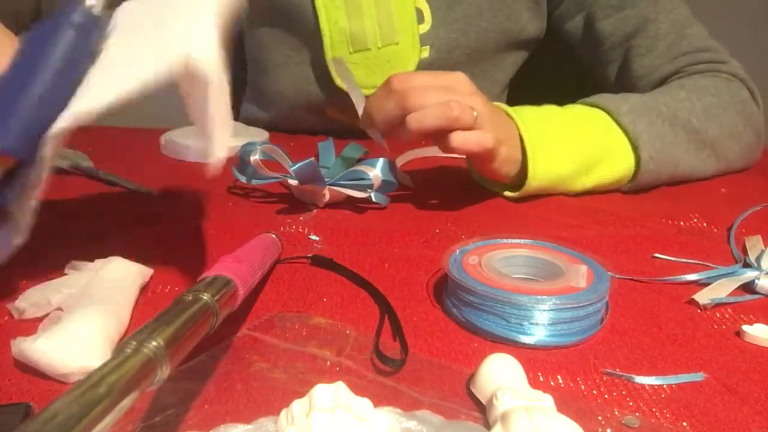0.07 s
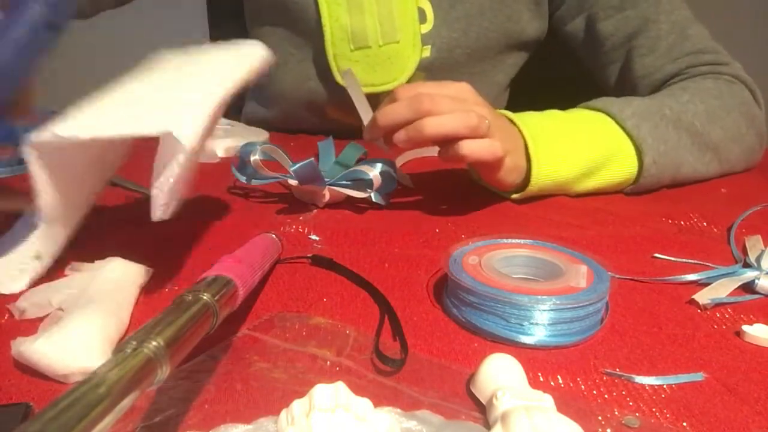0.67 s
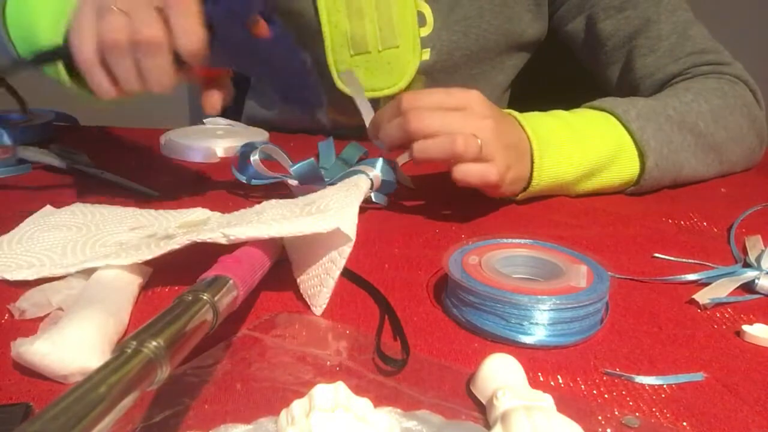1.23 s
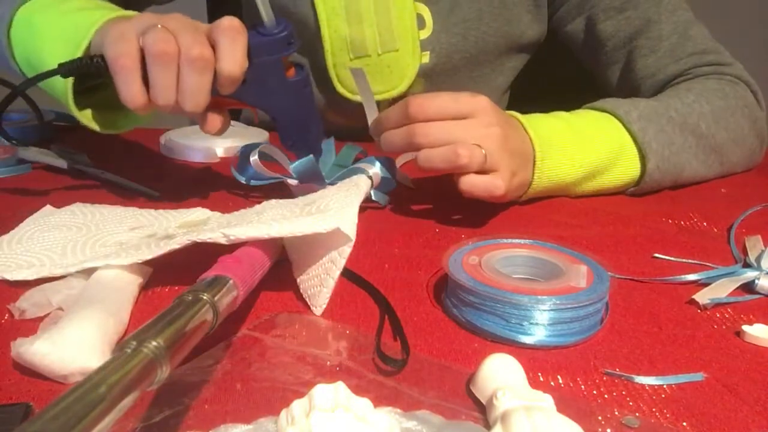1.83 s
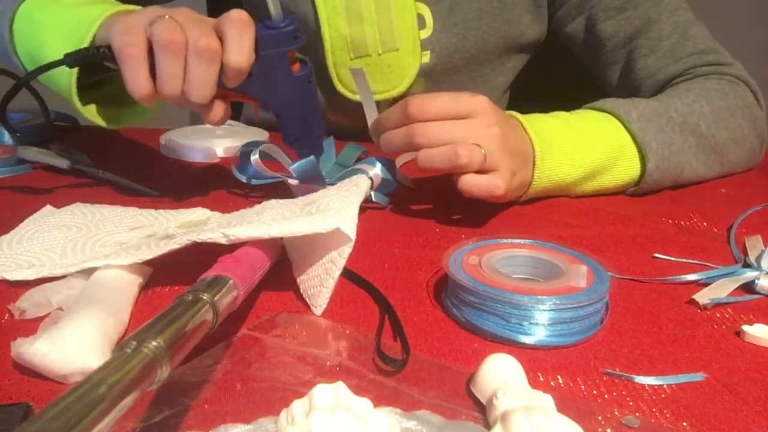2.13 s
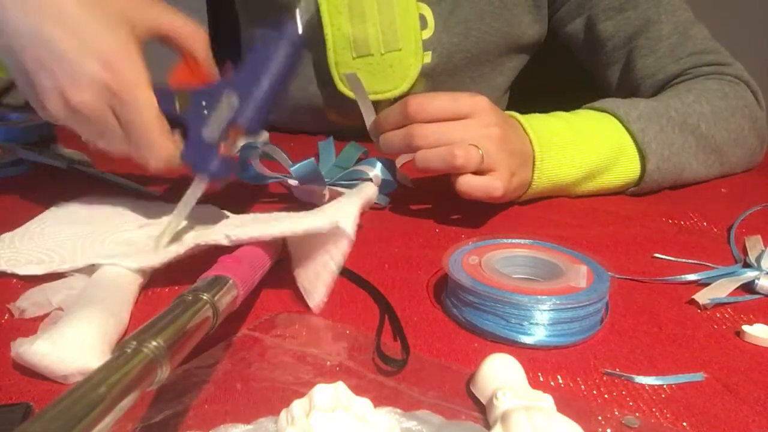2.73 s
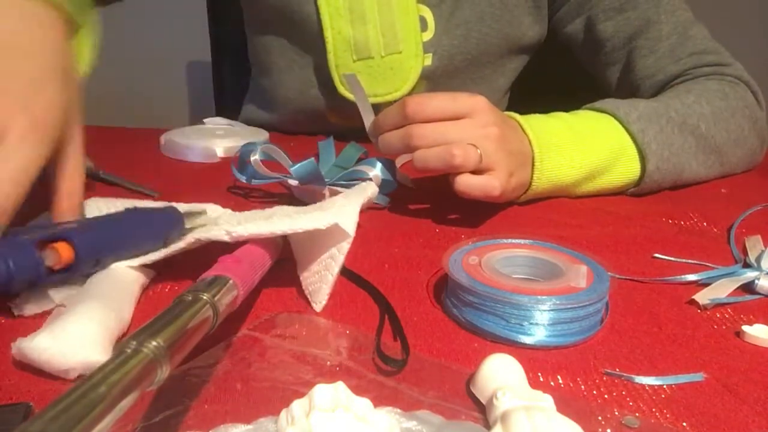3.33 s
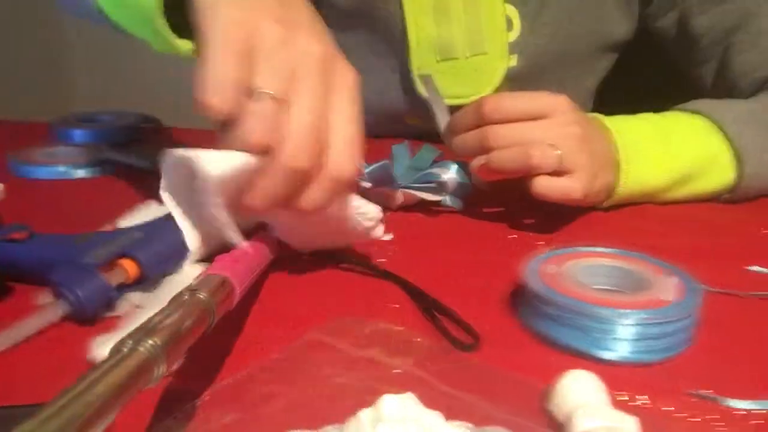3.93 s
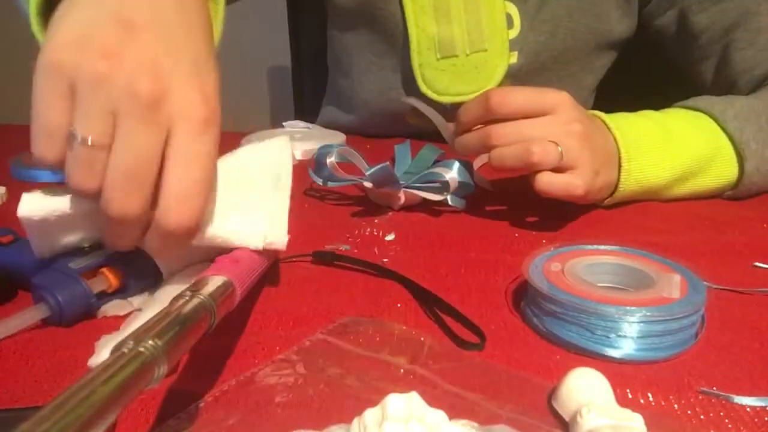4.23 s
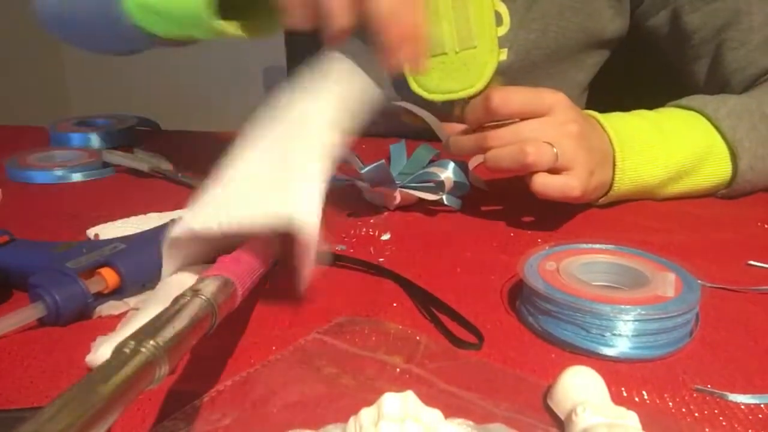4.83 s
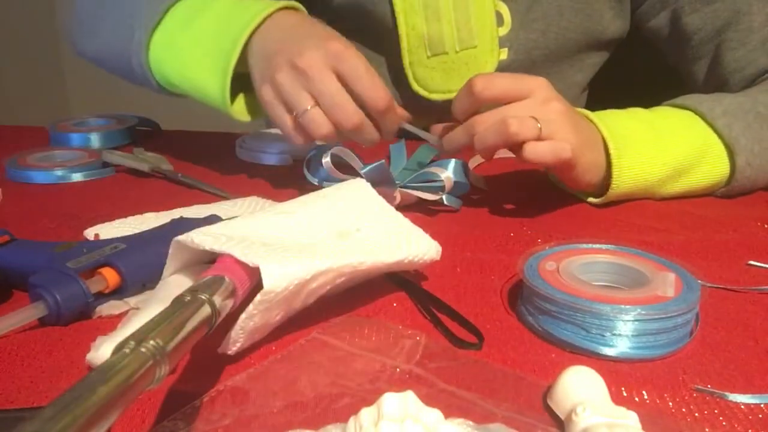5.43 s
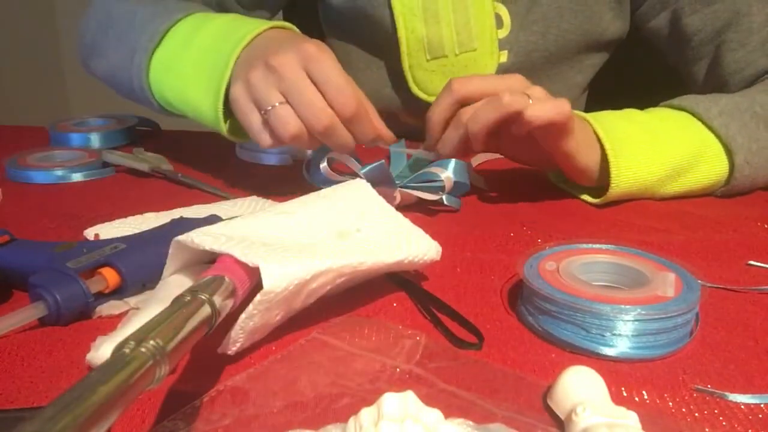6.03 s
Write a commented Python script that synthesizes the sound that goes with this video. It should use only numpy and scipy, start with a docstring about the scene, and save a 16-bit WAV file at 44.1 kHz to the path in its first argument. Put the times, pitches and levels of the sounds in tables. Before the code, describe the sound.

In a small, quiet room, a microphone on the table picks up soft room noise, a faint appliance hum and a thin whine. During the first second a paper towel drags and rustles softly while a plastic glue gun gives light, hollow ticks, with a sharper click at about 1 second. Until 3 seconds there are only sparse small taps, faint ribbon rubs and a brief brush of paper. At about 3.3 seconds the gun thumps onto the cloth-covered table, clatters and topples with one loud knock at 3.4 seconds, the loudest moment. Another plastic tap follows near 3.9 seconds. From about 3.7 to 5 seconds the paper towel is dragged in several stronger, swelling strokes, its folds crinkling and snapping. A faint ribbon rub comes at about 5.3 seconds, then only room noise remains until 6 seconds.

```python
"""A plastic glue gun is handled and laid down on a cloth-covered table in a small, quiet room.
Its hollow shell rings in short ticks; it thumps, clatters and topples over with one loud knock
that shakes the tabletop. A paper towel is dragged and draped over the tools: its fibres catch and
slip in swelling strokes, and its folds snap. Ribbon rustles under the fingers.
Behind it all are soft room noise, the hum of a far appliance and a thin whine."""
import sys
import numpy as np
from scipy import signal
from scipy.fft import rfft, irfft
from scipy.io import wavfile
from scipy.ndimage import uniform_filter1d

SR = 44100
rng = np.random.default_rng(int(sys.argv[2]) if len(sys.argv) > 2 else 0)


def store_wav(level_fs):
    """Save 16-bit WAV to argv[1]."""
    pcm = np.round(np.clip(np.atleast_2d(level_fs), -1, 1) * 32767)
    wavfile.write(sys.argv[1], SR, pcm.T.astype(np.int16))


N = 268569
TIME, BINS = np.arange(N) / SR, np.fft.rfftfreq(N, 1 / SR)

# The tone colour of each noise. Each row: frequency in Hz, relative level in dB.
AIR_COLOUR = [(10, -22.5), (25, -12.5), (52, 3.5), (95, -9), (170, -7.5), (400, -13.5), (1000, -15),
              (2000, -21), (4000, -27), (6500, -31), (8500, -31), (15500, -39.5)]  # the still room
SCRAPE_COLOUR = [(300, -11.5), (650, -2), (1000, 1), (1500, 4.5), (2200, -0.5), (3400, -13.5),
                 (6000, -27.5)]  # the towel's mid-pitched scrape
HISS_COLOUR = [(1400, -42), (2500, 1.5), (3300, 2.5), (4500, 0.5), (6100, 0.5), (8000, -6), (11000, -9),
               (15500, -23.5)]  # its high hiss
FLAP_COLOUR = [(30, -4), (80, -2.5), (160, -0.5), (300, 0), (550, -8.5), (900, -13.5), (2000, -48)]  # its low flapping
FOLD_COLOUR = [(300, -15), (1300, -1), (2600, 1), (5500, -7.5), (9000, -13.5), (15000, -24)]  # its snapping folds
RIBBON_COLOUR = [(1200, -23), (2700, 1), (3500, 0.5), (5000, 3.5), (6700, 0.5), (9000, -8), (15000, -27)]  # rubbed ribbon
ECHO_COLOUR = [(60, -6), (200, 4), (600, -1), (1300, 1), (3500, -0.5), (7000, -5), (15000, 0)]  # the room's echo
# How long the echo lasts. Each row: frequency in Hz, fade time in seconds.
# A fade time, or t60, is how long a sound takes to drop by 60 dB.
ECHO_FADE = [(100, .5), (300, 0.49), (800, 0.3759), (2000, 0.4849), (5000, 0.44), (14000, 0.51)]
# Strokes of the towel. Each row: fastest moment in seconds, level in dB, rise and fall in seconds,
# extra level for the hiss and for the flap in dB.
TOWEL_STROKES = [(.01, -63, 0.028, .035, -5.5, -11), (.1, -71, .04, 0.036, -1.5, -2),
                 (.168, -66.5, 0.034, 0.014, -5, -4), (.258, -69.5, 0.039, 0.038, 5, -0.5),
                 (.38, -70.5, 0.075, 0.036, 5, 2.5), (.51, -76.5, 0.035, .03, -3, 7),
                 (.65, -67.5, 0.096, 0.033, -7.5, -6), (.75, -72, 0.023, 0.028, -1, 2),
                 (.925, -69.5, 0.048, .035, 1.5, 6), (1.17, -77.5, 0.11, 0.15, -3, 5.5),
                 (2.74, -66.5, .02, .04, 3, -8), (3.06, -75.5, .015, .04, -4, -3),
                 (3.183, -65.5, 0.011, 0.013, -15, 1.5), (3.245, -66, 0.012, 0.055, -7, 4),
                 (3.746, -68.5, 0.0059, 0.067, 1.5, -5), (3.9, -64, 0.015, 0.015, -1.5, 12.5),
                 (3.973, -54.5, 0.023, 0.029, -1, 5.5), (4.10, -50.5, 0.032, 0.058, -4, -9.5),
                 (4.376, -56.5, 0.07, 0.025, -5.5, -8.5), (4.465, -57, 0.044, 0.041, -1.5, -2),
                 (4.614, -51.5, .04, 0.036, -1, -11), (4.765, -58, 0.054, 0.034, -3.5, -6),
                 (4.882, -69, 0.0091, 0.011, 2, -1), (5.012, -68, 0.044, 0.023, -3, 0)]
# Taps: plastic parts of the gun, and one tick of the ribbon at 1.26 s. Each row: start in seconds, ring level
# in dB, ring pitch in Hz, # snap level in dB, snap brightness in Hz, relative echo level in dB.
TAPS = [(0.1514, -44, 1090, -59, 2500, 2), (0.3032, -41.5, 1060, -61, 3000, -0.5),
        (.3492, -42.5, 1390, -69, 3000, -8), (0.467, -41, 940, -42.5, 2200, -4),
        (.7075, -54, 3320, -49.5, 6900, -12), (0.9971, -50, 2950, -34, 5270, -20),
        (0.9992, -37.5, 5070, -38, 4350, -1.5), (1.01, -54, 6000, -41, 5000, -6),
        (1.2588, -50, 3500, -56.5, 6500, 2), (1.6, -54.5, 735, -63.5, 5040, -16),
        (2.3525, -45.5, 2450, -55, 2980, -9), (2.6848, -53.5, 1000, -59.5, 2800, -5),
        (3.1641, -44, 1130, -44.5, 4700, -0.5), (3.2266, -36, 880, -48, 2100, -1.5),
        (3.278, -37, 455, -56, 12000, 5.5), (3.304, -33.5, 950, -35, 2600, -3.5),
        (3.361, -30.5, 1030, -26, 5300, -6), (3.3812, -30, 725, -40.5, 3500, 6),
        (3.4015, -28, 2050, -36, 10500, -17.5), (3.41, -26, 2340, -38, 7000, -16),
        (3.4518, -54, 2730, -48, 4930, -19), (3.4715, -46, 2680, -46.5, 6000, -18),
        (3.8458, -47, 463, -51.5, 4400, -2), (3.9095, -28, 1085, -40, 7000, -28)]
# Modes, the tones a thing rings with. Each row: pitch in Hz, relative level in dB, fade time in seconds.
SHELL_MODES = [(2050, -6.5, 0.01), (2460, -4.5, 0.016), (2950, 2, .011), (3500, -3.5, 0.016),
               (4400, -0.5, 0.0098), (5840, 4, 0.0083), (7400, 3.5, 0.0059), (9200, -5, .005),
               (12000, 5.5, .004), (14500, 12.5, .004)]  # the gun's hollow shell
TABLE_MODES = [(85.5, -17.5, 0.078), (116.7, -17.5, 0.45), (192, -10, 0.09), (241, -16, 0.22),
               (293, -11, 0.07), (458, -8.5, 0.019), (616, -2.5, 0.057), (690, -3.5, .03),
               (880, -6.5, 0.017), (1090, -3, 0.03), (1410, -3, 0.013), (1703, -13.5, 0.01),
               (2205, -16.5, .02), (2370, -25, 0.014), (2832, -18, 0.031)]  # the tabletop with the gun on it
ROOM_MODES = [(117.5, -27, .7), (197, -30.5, .55), (286, -25, .33), (324, -27.5, 0.59), (389, -16, .22),
              (440, -21, .36), (483, -27, .4), (608, -16, 0.11), (743, -22.5, .35), (831, -23.5, .33)]  # the room's low standing waves
# Rubs of ribbon and of plastic on cloth. Each row: start in seconds, hiss level in dB, rise and fade
# time in seconds, then a fuzzy tone's level in dB, pitch in Hz and width in Hz.
SHORT_RUBS = [(.585, -80, 0.056, 1, -58.5, 980, 305), (1.26, -70.5, 0.0026, 0.48, -78, 3430, 253),
              (2.225, -70.5, 0.01, 0.36, -70.5, 3500, 300), (5.245, -65, 0.015, 0.44, -69, 3500, 70)]
# Large folds of the towel snapping through. Each row: start in seconds, level in dB.
FOLD_SNAPS = [(0.925, -52), (3.7417, -52.5), (3.9575, -44), (4.03, -45), (4.621, -44), (4.7642, -45.5),
              (4.8768, -54.5), (5.0097, -46), (5.0188, -57)]
# Blows on the table. Each row: start in seconds, level in dB, treble cutoff in Hz (higher is harder),
# fade time of the hand's damping in seconds, relative echo level in dB.
TABLE_BLOWS = [(0.999, -44, 231, 1.5, -1.5), (3.277, -10.5, 133, .2, -7), (3.3614, -31, 200, .2, -10.5),
               (3.4007, -14.5, 2900, 1.5, -9)]
# Pitches the microphone hears less well. Each row: centre in Hz, width in Hz, level change in dB.
MIC_DIPS = [(4940, 150, -2.5), (8340, 1064, -3.5), (10500, 1000, -7)]


def amp(db):
    """Turns decibels into a gain to multiply by."""
    return 10 ** (np.asarray(db) / 20)


def unit(x):
    """Scales a signal to an average (rms) level of 1."""
    return x / np.sqrt(np.mean(x ** 2) + 1e-20)


def look_up(points, hz):
    """Reads between a table's rows on a log-frequency axis."""
    row_hz, value = np.transpose(points)
    return np.interp(np.log(hz + 1), np.log(row_hz + 1), value)


def colour(x, spectrum):
    """Gives a full-length signal a tone colour, at level 1."""
    return unit(irfft(rfft(x) * amp(look_up(spectrum, BINS)), N))


def soften(x, hz, order=2):
    """Turns down the treble above hz."""
    return signal.sosfilt(signal.butter(order, min(hz, SR / 2 - 100), fs=SR, output="sos"), x)


def thin(x, hz):
    """Turns down the bass below hz: small things give off little of it."""
    return signal.sosfilt(signal.butter(2, hz, "high", fs=SR, output="sos"), x)


def add(mix, start, sound):
    """Mixes a sound in at a start time in seconds."""
    part = mix[max(round(start * SR), 0):][:len(sound)]
    part += sound[:len(part)]


def fade(t, t60):
    """A gain that drops by 60 dB every t60 seconds."""
    return np.exp(-np.log(1000) * t / max(t60, 1e-4))


def ring(modes, t):
    """Fading pure tones set off by one blow."""
    return sum(amp(db) * fade(t, t60) * np.sin(2 * np.pi * hz * t) for hz, db, t60 in modes)


def wander(per_s):
    """A smooth random wobble at level 1."""
    return unit(irfft(rfft(rng.standard_normal(N)) * np.exp(-(BINS / per_s) ** 2), N))


def fuzzy_tone(hz, width_hz, size=N):
    """Noise gathered around one pitch, at level 1."""
    away = (np.fft.rfftfreq(size, 1 / SR) - hz) / width_hz
    return unit(irfft(rfft(rng.standard_normal(size)) / (1 + away ** 2), size))


def echo(x, delay_s=0.002, build_s=0.0018):
    """The room's echo builds up after the first walls answer, then dies away."""
    hz, t, bands = signal.stft(rng.standard_normal(SR), SR, nperseg=512)
    decay = np.exp(-np.log(1000) * t / look_up(ECHO_FADE, hz)[:, None])
    bands = bands * amp(look_up(ECHO_COLOUR, hz)[:, None]) * decay
    onset = np.clip((TIME[:SR] - delay_s) / build_s, 0, 1)
    tail = signal.istft(bands, SR, nperseg=512)[1][:SR] * onset
    return signal.fftconvolve(x, tail / np.linalg.norm(tail))[:N]


def room_air(hum_hz=132, whine_hz=1030, waver_hz=12):
    """Steady room noise, a far appliance's faint hum and a thin, wavering whine."""
    pitch = whine_hz + waver_hz * wander(per_s=35)
    whine = unit(np.sin(2 * np.pi * np.cumsum(pitch) / SR))
    noise = colour(rng.standard_normal(N), AIR_COLOUR)
    hum = fuzzy_tone(hum_hz, width_hz=10)
    return amp(-69) * noise + amp(-79) * hum + amp(-79.5) * whine


def stroke_gains(roundness=0.98):
    """Scrape, hiss and flap swell as each stroke speeds up and sink as it slows."""
    power = np.zeros((3, N))  # overlapping strokes add in power
    for peak, db, rise, fall, hiss_db, flap_db in TOWEL_STROKES:
        away = np.maximum((peak - TIME) / rise, (TIME - peak) / fall)
        swell = np.exp(roundness - np.hypot(np.minimum(away, 20), roundness))
        power += np.outer(amp([db, db + hiss_db, db + flap_db]), swell) ** 2
    return np.sqrt(power)


def folds(x, patchy_db=2.5):
    """Folds of the sheet favour some pitches for a moment, then others."""
    bands = signal.stft(x, SR, nperseg=512)[2]
    patches = uniform_filter1d(rng.standard_normal(bands.shape), size=3, axis=0)  # blur over pitch
    patches = uniform_filter1d(patches, size=9, axis=1)  # blur over time
    return signal.istft(bands * amp(patchy_db * unit(patches)), SR, nperseg=512)[1][:N]


def towel(catches_per_s=2400, spread_db=2, slip_db=1.56, slips_per_s=55):
    """Fibres catch and let go in uneven slips; the bending sheet adds soft flapping and crinkles."""
    sizes = amp(spread_db * np.minimum(rng.exponential(1, N), 5)) * rng.choice([-1, 1], N)
    catches = unit(sizes * (rng.random(N) < catches_per_s / SR))
    fibres = catches + 0.71 * rng.standard_normal(N)  # plain noise smooths the grain
    friction = folds(fibres * amp(slip_db * wander(slips_per_s)))
    scrape_gain, hiss_gain, flap_gain = stroke_gains()
    scrape = amp(0.5) * scrape_gain * colour(friction, SCRAPE_COLOUR)
    hiss = hiss_gain * colour(friction, HISS_COLOUR)
    flap = amp(-1) * flap_gain * colour(friction, FLAP_COLOUR)
    return scrape + hiss + flap + crinkles(hiss_gain)


def taps(snap_t60=0.0099, crowd_db=-1):
    """Each tap rings one small part, of the gun or the ribbon; its snap wakes the shell and a crowd of weaker
    modes."""
    t, direct, to_room = TIME[:SR // 20], np.zeros(N), np.zeros(N)
    decay = fade(t, snap_t60)
    shell = unit(ring(SHELL_MODES[::2], t) - ring(SHELL_MODES[1::2], t))
    for start, db, hz, snap_db, bright_hz, echo_db in TAPS:
        t60 = 0.011 * (1000 / hz) ** 0.13  # smaller parts ring higher and die sooner
        tone = thin(ring([(hz, db, t60)], t), hz=300)
        click = thin(soften(signal.unit_impulse(len(t)), bright_hz), bright_hz / 6.1)
        crowd = amp(crowd_db) * unit(decay * rng.standard_normal(len(t)))
        snap = signal.fftconvolve(click, shell + crowd)[:len(t)]
        strength = amp(snap_db) * np.linalg.norm(decay)
        add(direct, start, tone + strength * snap / np.linalg.norm(snap))
        # the room gathers all directions, so it hears the snap as a plain click
        plain_click = strength * click / np.linalg.norm(click)
        add(to_room, start, amp(echo_db) * (amp(-4) * tone + amp(-2) * plain_click))
    return direct + echo(to_room)


def rubs(flutter_db=2):
    """Ribbon or plastic slides: a thin hiss and one tone of the rubbed thing swell and die together."""
    t, out = TIME[:SR // 2], np.zeros(N)
    flutter = amp(flutter_db * wander(per_s=70))
    hiss = colour(rng.standard_normal(N) * flutter, RIBBON_COLOUR)[:len(t)]
    for start, hiss_db, rise, t60, tone_db, hz, width_hz in SHORT_RUBS:
        rub = amp(hiss_db) * hiss + amp(tone_db) * fuzzy_tone(hz, width_hz, len(t))
        add(out, start, rub * (1 - np.exp(-t / rise)) * fade(t, t60))
    return out


def crinkles(movement, small_per_s=40, small_db=-3, spread_db=2, echo_db=-7):
    """Folds snap in short bursts: a few large ones, and small ones at random while the towel moves."""
    sizes = amp(small_db + spread_db * np.minimum(rng.exponential(1, N), 2))
    snaps = movement * sizes * (rng.random(N) < small_per_s / SR)
    for start, db in FOLD_SNAPS:
        add(snaps, start, amp([db]))
    bursts = signal.oaconvolve(snaps, fade(TIME[:SR // 20], t60=0.012))[:N]
    direct = bursts * colour(rng.standard_normal(N), FOLD_COLOUR)
    return direct + amp(echo_db) * echo(direct)


def table_knocks(build_s=0.0056, crowd_db=-10, smack_db=13):
    """The gun strikes the table: a cushioned blow wakes only the low modes, a hard one all of them."""
    t, direct, to_room = TIME[:SR], np.zeros(N), np.zeros(N)
    # neighbouring modes swing in opposite directions where the gun lands
    board = ring(TABLE_MODES[::2], t) - ring(TABLE_MODES[1::2], t)
    room_boom = ring(ROOM_MODES, t) * (1 - np.exp(-t / build_s))
    # a crowd of weaker modes fills the gaps; the room hears them as one even smack
    smack = thin(soften(signal.unit_impulse(SR), hz=2400, order=6), hz=450)
    smack = smack / np.linalg.norm(smack)
    crowd = signal.fftconvolve(smack, fade(t, t60=0.062) * rng.standard_normal(SR))[:SR]
    for start, db, cutoff_hz, hand_t60, echo_db in TABLE_BLOWS:
        held = board * fade(t, hand_t60)
        knock = held + amp(crowd_db) * crowd + amp(echo_db) * room_boom
        scattered = held + amp(smack_db) * smack
        add(direct, start, amp(db) * soften(knock, cutoff_hz, order=3))
        add(to_room, start, amp(db + echo_db) * soften(scattered, cutoff_hz, order=3))
    return thin(direct + echo(to_room), hz=60)


def scene():
    """All the sounds meet at one microphone on the table."""
    return (room_air() + towel() + taps() + rubs() + table_knocks())[None]


def record(dry):
    """The microphone dulls a few high bands, then the recorder cuts off the top treble."""
    dips_db = sum(db / (1 + ((BINS - hz) / width) ** 2) for hz, width, db in MIC_DIPS)
    heard = irfft(rfft(dry) * amp(dips_db), N)
    treble_cut = signal.firwin(511, cutoff=15850, window=("kaiser", 9), fs=SR)
    return signal.oaconvolve(heard, treble_cut[None], "same")


dry = scene()
out = record(dry)
store_wav(out)
```